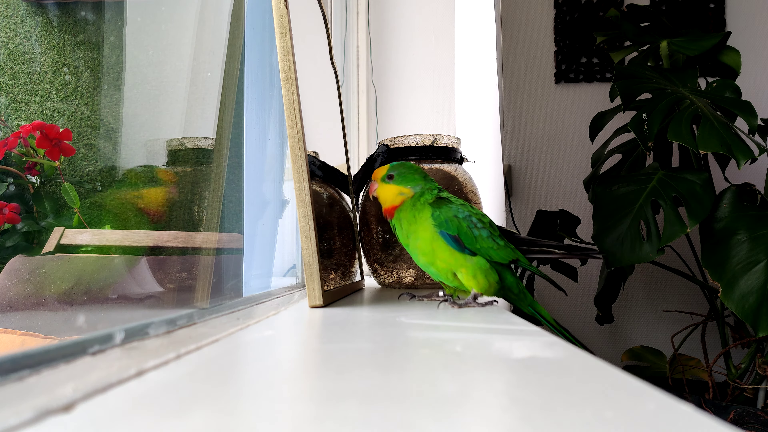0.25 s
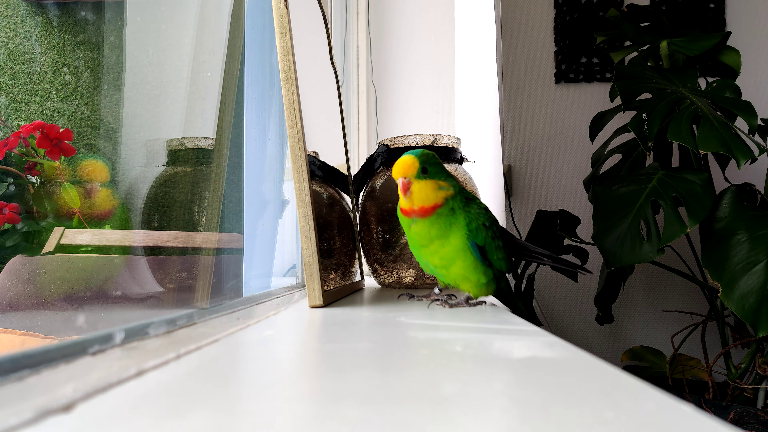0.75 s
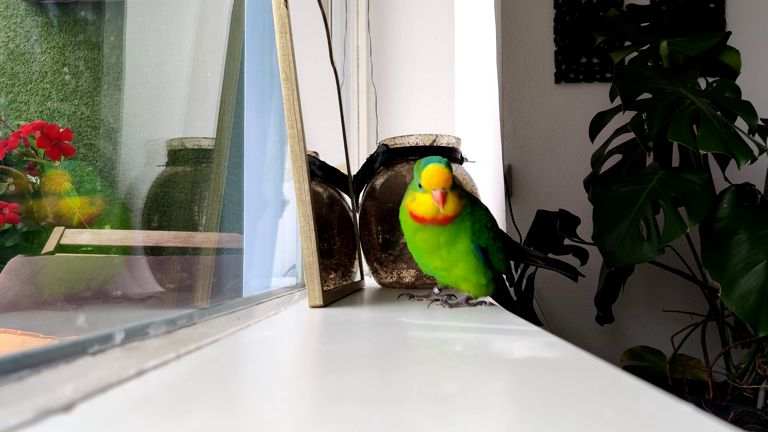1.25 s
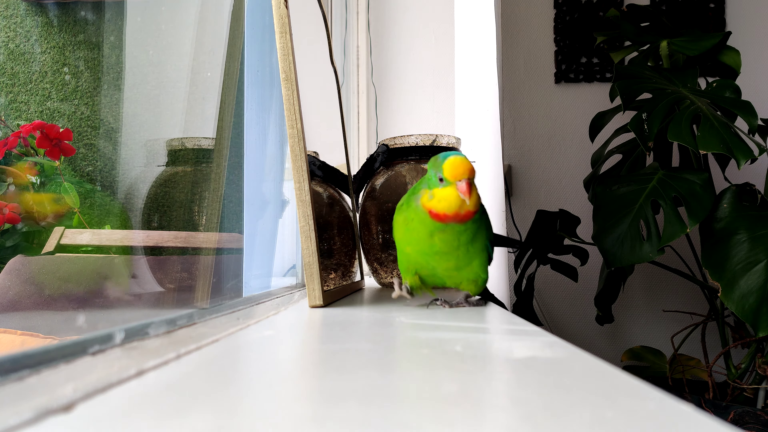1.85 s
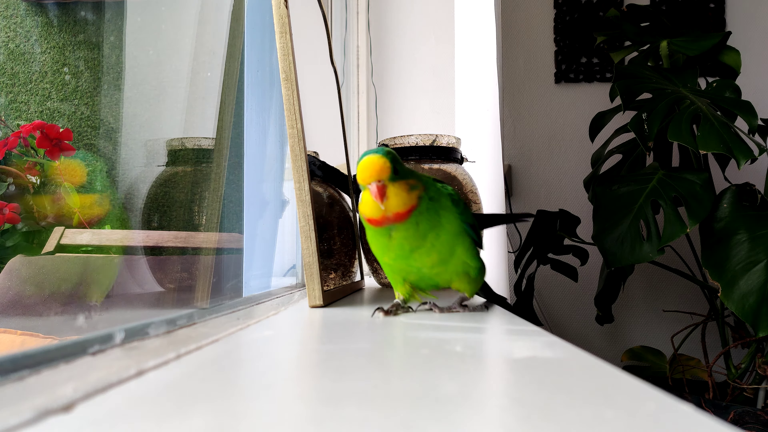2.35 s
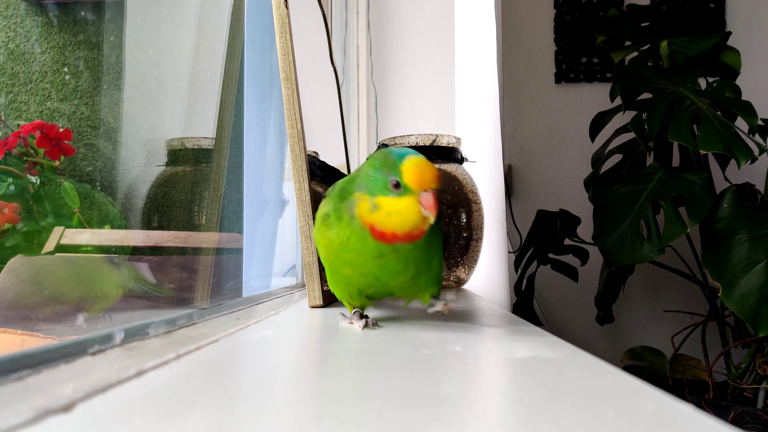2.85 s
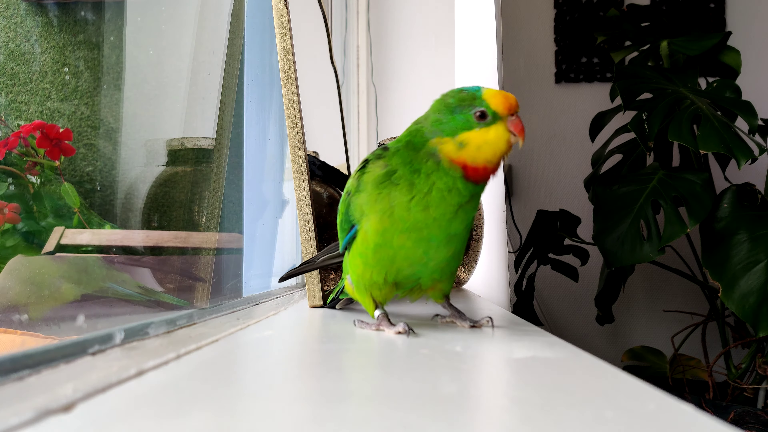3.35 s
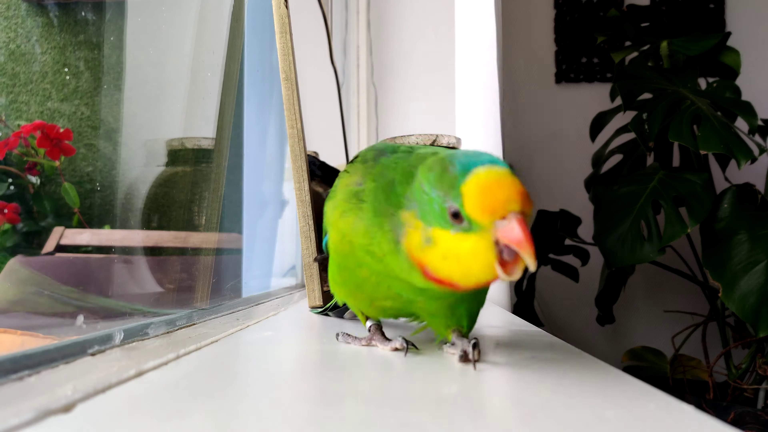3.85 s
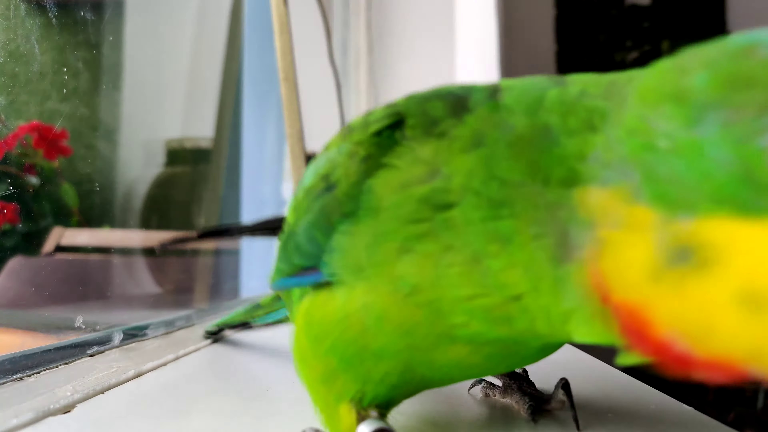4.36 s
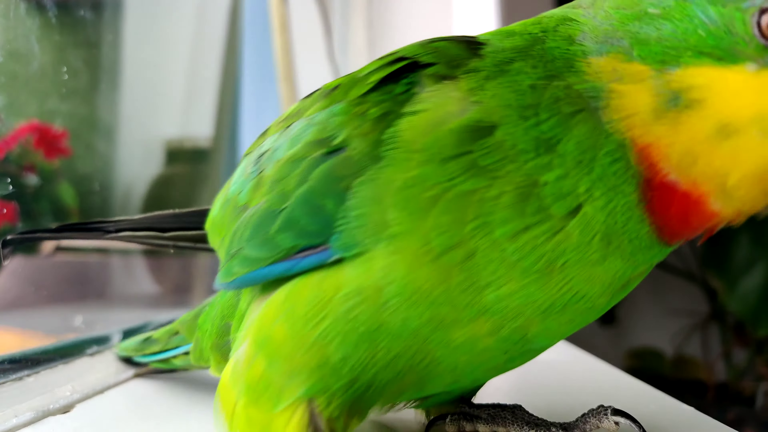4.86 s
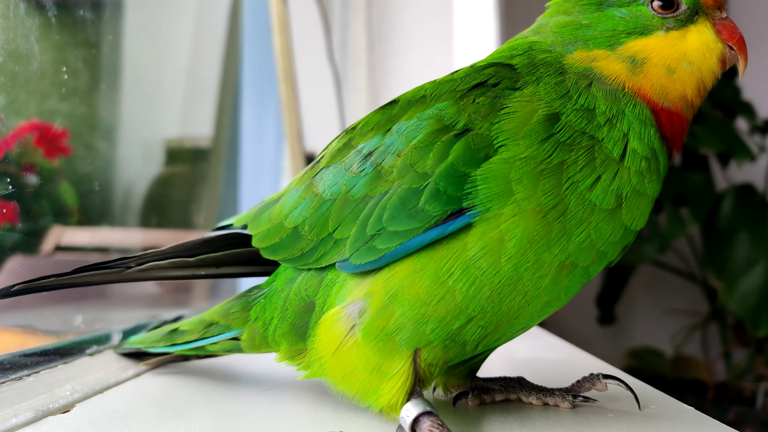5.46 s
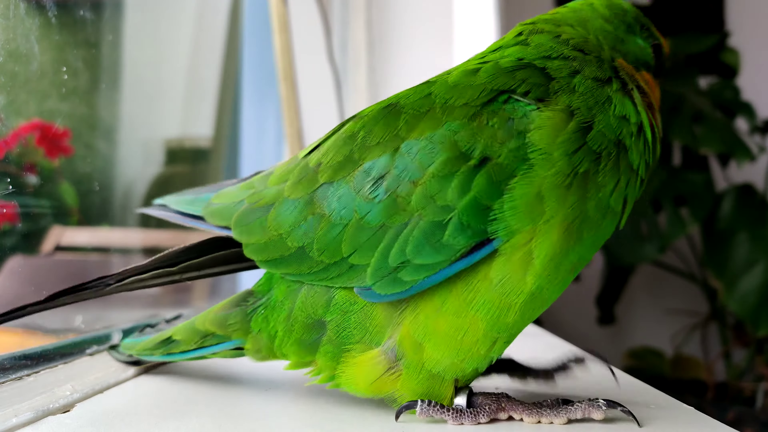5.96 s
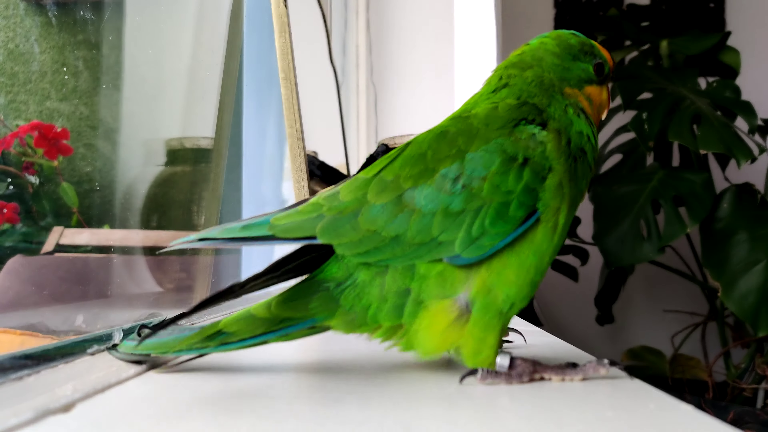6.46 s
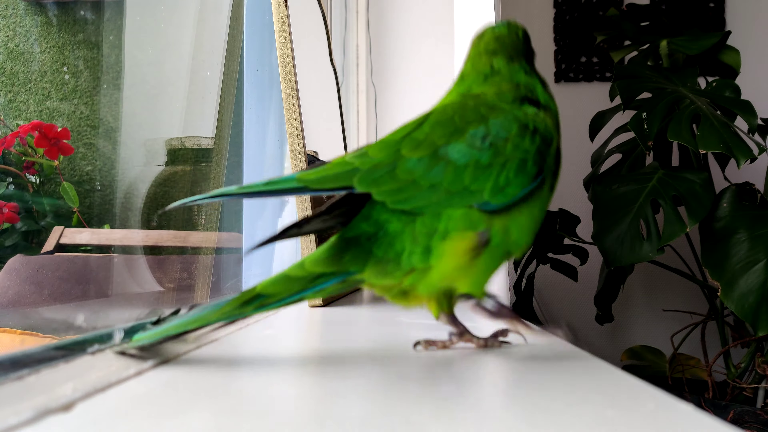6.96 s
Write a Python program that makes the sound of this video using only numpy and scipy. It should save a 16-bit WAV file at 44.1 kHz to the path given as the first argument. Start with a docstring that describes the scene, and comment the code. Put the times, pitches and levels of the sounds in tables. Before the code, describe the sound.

A harsh, pulsing parrot shriek rings through a hard-walled room, then low rumble and faint hiss remain. Small clawed feet start tapping on a hollow board, hurrying up to the stereo microphones with clicks, scratches and dull thumps. A close, bright, very quick chattering call drops in pitch, followed by a single clear yip. Near silence follows, then sparse steps and light rustling at the end.

```python
"""Parrot on a hollow sill

A parrot gives a harsh warbling squawk, patters up to the microphones, then chatters a falling call and a yip.
Calls are harmonic tones with roughness and breath noise, shaped by throat and beak resonances.
Steps are filtered noise bursts, ringing modes and claw scrapes; calls and steps excite a bare room.
Rumble, hiss, hum and a brief drone lie below; a limiter on each channel ducks under peaks and recovers."""
import sys
import numpy as np
from scipy import signal
from scipy.fft import rfft, irfft, next_fast_len
from scipy.io import wavfile
from scipy.ndimage import uniform_filter1d, minimum_filter1d, map_coordinates

SR = 44100
rng = np.random.default_rng(int(sys.argv[2]) if len(sys.argv) > 2 else 0)


def file_out(sig):
    """Save sig as 16-bit WAV at sys.argv[1]."""
    # one column per channel
    cols = np.atleast_2d(sig).T
    # limit, then scale
    lim = np.clip(cols, -1, 1)
    pcm = np.round(lim * 32767).astype(np.int16)
    wavfile.write(sys.argv[1], SR, pcm)


N = 317961
TOP_HZ = 16000  # band limit of the voices and of the output

# steps on the sill: t/s, strength/dB, claw raised and pad lowered by/dB, thud relative to strength/dB
FOOTFALLS = [(1.859, -58, 0.5, -5.5), (1.954, -53.5, -1, 5), (1.965, -55.5, 0.5, 1), (2.141, -60, -4, 5),
             (2.193, -48, -3.5, 3.5), (2.403, -47, -7.5, 1.5), (2.6, -48.5, -3, 4.5),
             (2.795, -47, -1.5, -1), (2.888, -60.5, 2.5, -3), (2.961, -46, 2, -5), (3.184, -48.5, -7, 6),
             (3.522, -49.5, 4.5, -4), (3.704, -45, -6.5, 7.5), (3.896, -49, 3.5, 9.5),
             (4.056, -53.5, 6, -7), (4.102, -45, -1.5, 6), (4.11, -39.5, -1, -6.5), (4.135, -39, -7.5, 0.5),
             (4.268, -46, 6, 3.5), (4.397, -47, 1.5, 6), (4.501, -49, 7.5, -1), (4.515, -43.5, 5, 10),
             (4.558, -39, -1.5, 8), (4.578, -48, -8.5, -1), (4.844, -43.5, 1, 9),
             (5.038, -47.5, -3.5, 15.5), (5.961, -53, 2, 7), (6.12, -46, 0.5, 1), (6.362, -47, -1.5, 5),
             (6.481, -50.5, 1, 7.5), (7.02, -57.5, 3, 5.5), (7.099, -46.5, 3.5, 0.5), (7.141, -45, 1.5, 4)]


def amp(db):
    """Decibels to gain."""
    return 10 ** (np.asarray(db) / 20)


def unit(x):
    """Scale to rms 1."""
    return x / np.sqrt(np.mean(x ** 2) + 1e-20)


def along(points, hz):
    """Read (f/Hz, value) points on a log-frequency axis."""
    f, v = np.transpose(points)
    return np.interp(np.log(hz + 1), np.log(f), v)


def wobble(rate_hz, size):
    """Smooth random curve with rate_hz knots a second."""
    knots = rng.standard_normal(int(size * rate_hz / SR) + 4)
    return map_coordinates(knots, [np.arange(size) * rate_hz / SR])


def filtered(x, response):
    """Multiply the spectrum of x by a function of f/Hz."""
    m = next_fast_len(x.shape[-1] + 8192)
    spectrum = rfft(x, m) * response(np.fft.rfftfreq(m, 1 / SR))
    return irfft(spectrum, m)[..., :x.shape[-1]]


def noise(spectrum, shape):
    """Coloured noise of rms 1."""
    return unit(filtered(rng.standard_normal(shape), lambda hz: amp(along(spectrum, hz))))


def causal(spectrum, size):
    """Minimum-phase impulse response of a given colour: sharp start, then decay."""
    log_gain = np.log(amp(along(spectrum, np.fft.rfftfreq(2 * size, 1 / SR))))
    cepstrum = irfft(log_gain)
    folded = np.r_[cepstrum[0], 2 * cepstrum[1:size]]
    return irfft(np.exp(rfft(folded, 2 * size)))[:size]


def ports(side_db):
    """Left and right gains of mean 1 for a left-minus-right level difference."""
    gains = amp(np.array([[.5], [-.5]]) * side_db)
    return gains / gains.mean(0)


def add(track, s, sound):
    """Mix a sound into a track at time s."""
    part = track[..., max(round(s * SR), 0):][..., :sound.shape[-1]]
    part += sound[..., :part.shape[-1]]


def fades(t, attack_s, release_s):
    """Gain of a note that rises, holds and falls linearly."""
    return np.clip(t / attack_s, 0, 1) * np.clip((t[-1] - t) / release_s, 0, 1)


def background():
    """Soft rumble and hiss as stereo noise, a wavering low hum and one brief deeper drone."""
    # quiet room: f/Hz, relative density/dB per Hz
    air_spectrum = [(20, -1), (45, -1), (70, -10), (105, -8), (150, -14.5), (222, -14.5), (370, -18.5),
                    (740, -20.5), (1400, -29), (2500, -30.5), (5200, -40.5), (8000, -46), (13000, -42),
                    (16000, -45)]
    t = np.arange(N) / SR
    mid, side = noise(air_spectrum, (2, N))
    side_spectrum = [(100, -13.0), (1000, -1.5), (4000, 0.5), (9000, 0.5)]
    side = filtered(side, lambda hz: amp(along(side_spectrum, hz)))
    balance = [(40, 1.5), (200, 3.5), (1000, 3.3), (6000, 0.5)]  # f/Hz, left minus right/dB
    air = filtered(np.array([mid + side, mid - side]), lambda hz: ports(along(balance, hz)))
    hum_hz = 228 + 4 * wobble(25, N)
    hum = np.sin(2 * np.pi * np.cumsum(hum_hz) / SR) * amp(3 * wobble(4.7, N))
    hum_db = np.interp(t, [0, 1.3, 2.7, 4.5, 7.2], [-69.0, -61.5, -58.0, -65.5, -65.5])
    drone = amp(-53.0) * np.sin(2 * np.pi * 101 * t) * np.exp(-((t - 6.7) / 0.17) ** 2)
    sway_db = .8 * wobble(4, N)
    return amp(-53.5 + sway_db) * air + (amp(hum_db) * hum + drone) * ports(4.7)


def room(x, build_s):
    """Room reverberation: noise builds up, then each frequency decays at its own speed."""
    # decay: f/Hz, t60/s
    room_t60 = [(150, 1), (1000, 0.62), (3000, 0.54), (5500, 0.46), (9000, 0.45), (15000, 0.4)]
    # tail colour: f/Hz, level/dB
    room_colour = [(150, -3), (1100, -6.5), (1800, -3.5), (2600, 0.5), (3200, -3), (3800, 0.5),
                   (4500, -3.5), (5400, 1), (6500, 1), (9000, -3), (15000, 0)]
    # tail balance: f/Hz, left minus right/dB
    room_side = [(200, -0.5), (700, 7), (1300, -0.5), (4400, 0.5), (8000, -3), (15000, -3)]
    hz, t, z = signal.stft(rng.standard_normal((2, SR)), SR, nperseg=256)
    envelope = amp(-60 * t / along(room_t60, hz)[:, None]) * (1 - np.exp(-t / build_s))
    tail = signal.istft(z * envelope, SR, nperseg=256)[1]
    tail = unit(tail) / np.sqrt(SR)
    tail = filtered(tail, lambda f: amp(along(room_colour, f)) * ports(along(room_side, f)))
    return signal.fftconvolve(np.atleast_2d(x), tail, axes=1)[:, :N]


def ringing(modes, attack_s):
    """Damped modes, at new strengths for each blow."""
    t = np.arange(SR // 2) / SR
    total = sum(amp(db + rng.normal(0, 2.7) - 60 * t / t60) * np.sin(2 * np.pi * hz * t)
                for hz, db, t60 in modes)
    return total * (1 - np.exp(-t / attack_s))


def recoloured(spectrum):
    """Each step lands on another spot: bands are raised and lowered by chance."""
    spot_colour_db = 1.3
    return [(hz, db + rng.normal(0, spot_colour_db)) for hz, db in spectrum]


def contact(spectrum, t60, spike_db, linger_db, linger_t60, apart, grain_db):
    """One sharp push, a grainy scatter of toes and a weaker rattle; the scatter differs at the two ports."""
    t = np.arange(SR // 5) / SR
    grain = amp(grain_db * wobble(600, len(t)))
    decay = amp(-60 * t / t60) + amp(linger_db - 60 * t / linger_t60)
    scatter = rng.standard_normal((2, len(t))) * grain * decay
    mid, side = scatter / np.linalg.norm(scatter[0])
    mid = mid + amp(spike_db) * (t == 0)
    pair = [mid + apart * side, mid - apart * side]
    pair = signal.fftconvolve(pair, causal(spectrum, size=2048)[None], axes=1)
    # energy of the channel mean = rms 1 over 10 ms
    return pair / np.sqrt(np.sum(pair.mean(0) ** 2) / (SR / 100))


def footfall(db, claw_db, weight_db):
    """Board and claw sounds of one step: thud and knock of the pad, click and scratch of the claw."""
    # four parts of a step: f/Hz, relative density/dB per Hz
    thud_spectrum = [(35, -9), (130, -4.5), (300, -8.5), (550, -14.5), (2000, -64)]
    knock_spectrum = [(150, -20), (420, 2), (850, 5), (1500, 0), (2800, -8.5), (8000, -47.5)]
    click_spectrum = [(900, -33.5), (2500, -4), (3800, -2), (5000, 0.5), (7000, -9), (11000, -16.5)]
    scratch_spectrum = [(4000, -27.5), (9000, -1.5), (13500, -5.5), (16000, 0)]
    thud = contact(thud_spectrum, t60=0.052, spike_db=-5, linger_db=-12.5,
                   linger_t60=0.22, apart=0.64, grain_db=2.0)
    knock = contact(recoloured(knock_spectrum), t60=0.027, spike_db=0.0, linger_db=-6.0,
                    linger_t60=0.075, apart=0.94, grain_db=5.0)
    click = contact(recoloured(click_spectrum), t60=0.028, spike_db=-3.5, linger_db=-18.5,
                    linger_t60=.09, apart=0.92, grain_db=7)
    scratch = contact(scratch_spectrum, t60=.018, spike_db=-3.5, linger_db=-19.5,
                      linger_t60=.09, apart=1.0, grain_db=7.5)
    board = amp(db + weight_db - 1.5) * thud + amp(db - claw_db - 2.5) * knock
    claw = amp(db - 3.0) * click + amp(db + claw_db - 1.0) * scratch
    return board, claw * ports(side_db=3.0)


def toe_taps():
    """Light steps at random moments while the bird walks."""
    # spells of walking: from/s, to/s
    walks = [(1.85, 4.6), (5.85, 7.2)]
    taps_per_s, tap_db, spread_db = 2.5, -63.5, 3.5
    taps = []
    for start, end in walks:
        for _ in range(round(taps_per_s * (end - start))):
            taps.append((rng.uniform(start, end), rng.normal(tap_db, spread_db), 0, 0))
    return taps


def scrapes():
    """Claw scrapes, feather brushes and a drag after each listed step: grainy noise swells."""
    # scraping and brushing: centre t/s, half-length/s, level/dB
    rustles = [(2.251, .17, -64), (3.0, .06, -65.5), (3.78, .017, -46.5), (4.08, .028, -56),
               (4.477, .03, -47.5), (4.525, .045, -44.5), (4.835, .05, -52.5), (5.072, .08, -54),
               (6.201, 0.28, -66.5), (7.05, .1, -61.5), (7.171, .07, -59.5)]
    drag_delay_s, drag_half_length_s, drag_db = .02, 0.034, -20
    drags = [(s + drag_delay_s, drag_half_length_s, db + claw_db + drag_db)
             for s, db, claw_db, _ in FOOTFALLS]
    spectrum = [(1500, -12), (5000, -0.5), (9000, -3), (15000, -9.0)]
    track = np.zeros((2, N))
    for s, half_length_s, db in rustles + drags:
        size = int(2 * half_length_s * SR)
        grains = unit(noise(spectrum, (2, size)) * amp(4.5 * wobble(500, size)))
        add(track, s - half_length_s, amp(db) * grains * np.hanning(size) ** 2)
    return track


def feet():
    """Steps knock and tick; weight shifts boom in the sill's modes, and a few steps set metal ringing."""
    # heavy shifts of weight: t/s, level/dB
    thumps = [(.383, -40), (1.952, -55), (2.186, -52), (2.601, -49), (2.961, -46), (4.395, -46),
              (4.515, -43), (4.562, -45.5), (5.038, -36)]
    # sill modes: f/Hz, level/dB, t60/s
    sill_modes = [(139.3, 1, 0.3), (102.3, -6, 0.25), (226.2, -4, 0.13), (310.3, -5.5, 0.14),
                  (430, -7.5, .06), (1080, -5, 0.053)]
    # steps that set metal ringing: t/s, level/dB
    clinks = [(1.857, -70), (2.595, -57.5)]
    # faint metal ring: f/Hz, level/dB, t60/s
    metal_modes = [(1870, 2, 0.27), (3020, -2, 0.24), (3650, -7, 0.22), (4800, -2.5, 0.12),
                   (4600, -3.5, .32), (4885, -1, 0.28), (6240, -8, 0.2), (6230, -8.5, 0.21),
                   (7640, -10, 0.195), (7660, -1.5, 0.24), (9400, -2, 0.26)]
    sill, claws = np.zeros((2, N)), scrapes()
    for s, db, claw_db, weight_db in FOOTFALLS + toe_taps():
        board, claw = footfall(db, claw_db, weight_db)
        add(sill, s, board)
        add(claws, s, claw)
    for s, db in thumps:
        add(sill, s, amp(db) * ringing(sill_modes, attack_s=0.0013))
    for s, db in clinks:
        add(claws, s, amp(db) * ringing(metal_modes, attack_s=0.0042) * ports(1.3))
    # the board reaches the left port 8 samples earlier and louder
    sill = np.array([sill[0], np.roll(sill[1], 8)]) * ports(7.5)
    return sill + claws + amp(-10.5) * room(sill + claws, build_s=.008)


def syrinx(start, pitch, gain, rough, tilt_db, beak, jitter, flutter_db, rasp_db, half_db,
           throat_db=0, throat_width_hz=400):
    """A harmonic tone sweeps through throat and beak resonances; roughness shakes it and doubles its period."""
    # sharpest throat resonance; it sinks overall as the throat lengthens: t/s, f/Hz
    throat = [(.05, 4282), (.075, 5620), (.088, 5640), (.104, 4550), (.117, 4419), (.145, 3588),
              (.16, 3650), (.2, 3700), (.212, 3245), (.25, 3190)]
    flicker_db = 3  # independent flicker of each partial at full roughness
    t = start + np.arange(len(pitch)) / SR
    shaken_hz = pitch * (1 + jitter * rough * wobble(900, len(t)))
    phase = 2 * np.pi * np.cumsum(shaken_hz) / SR
    throat_hz = np.interp(t, *np.transpose(throat))

    def partials(k):
        """Multiples k of the pitch, lifted by throat_db as they cross the throat resonance."""
        hz = k * pitch
        gain_db = tilt_db * np.log2(np.maximum(k, 1))
        gain_db = gain_db + throat_db / (1 + ((hz - throat_hz) / throat_width_hz) ** 2)
        gain_db = gain_db + flicker_db * rough * np.array([wobble(400, len(t)) for _ in k])
        waves = np.sin(k * phase + rng.uniform(0, 2 * np.pi, k.shape))
        return np.sqrt(2) * np.sum(amp(gain_db) * (hz < TOP_HZ) * waves, axis=0)

    harmonics = np.arange(1, 15)[:, None]
    tone = partials(harmonics) + amp(half_db) * rough * partials(harmonics - .5)
    # turbulent air escapes once a cycle
    rasp = amp(rasp_db) * rough * rng.standard_normal(len(t)) * (1 + np.cos(phase))
    source = gain * amp(flutter_db * rough * wobble(700, len(t))) * (tone + rasp)
    voice = np.zeros(N)
    add(voice, start, signal.fftconvolve(source, causal(beak, size=1024)))
    return voice


def placed(voice, side, wet_db, build_s):
    """A call reaches each port with its own level and phase, then again by way of the room."""
    side = np.array(side)

    def paths(hz):
        lead_rad = along(side[:, ::2], hz)
        return ports(along(side[:, :2], hz)) * np.exp(np.array([[.5j], [-.5j]]) * lead_rad)

    return filtered(voice, paths) + amp(wet_db) * room(voice, build_s)


def chirp(beak, s, length_s, first_hz, held_hz, last_hz, db, rough, tilt_db):
    """A short note drops onto its pitch, holds and curls away, weakening as the pitch lifts."""
    drop_s, curl_power = .0019, 3.0
    attack_s, release_s, curl_db_per_octave = 0.0014, .0016, -15
    t = np.arange(0, length_s, 1 / SR)
    drop_hz = (first_hz - held_hz) * np.exp(-t / drop_s)
    curl_hz = (last_hz - held_hz) * (t / length_s) ** curl_power
    pitch = held_hz + drop_hz + curl_hz
    gain = amp(db + curl_db_per_octave * np.log2(pitch / held_hz)) * fades(t, attack_s, release_s)
    return syrinx(s, pitch, gain, rough, tilt_db, beak,
                  jitter=.06, flutter_db=5.5, rasp_db=-10.5, half_db=-21)


def squawk():
    """A high rough shriek; swoops pull its pitch, level, roughness and tilt towards a clearer tone."""
    # open throat and beak: f/Hz, level/dB
    open_beak = [(400, -27), (570, -9), (740, -28.5), (900, -18), (1080, -6), (1600, -12), (1870, -18),
                 (2200, -6), (2700, -7.5), (3400, -5), (4000, -3), (4450, -4.5), (4950, -13.5),
                 (5550, -7.5), (7400, -23.5), (8800, -12.5), (10800, -23), (13000, -39.5), (15500, -31)]
    # swoops: bottom t/s, fall/s, rise/s, lowest f/Hz, level/dB, tilt/dB per octave, shriek after it/dB
    swoops = [(.06, .02, .02, 1206, -12.5, 2, -10.5), (.112, .0185, .0095, 1095, -7.5, -2, -12),
              (.152, .0115, 0.013, 1114, -6, -1, -25.5), (.196, .0098, .0105, 1230, -5, -2.5, -8.5),
              (.244, .0135, 0.015, 1021, -4.5, -4, -10)]
    start_s, end_s, attack_s, release_s = .052, .256, .005, .008
    shriek_hz, shriek_rough, shriek_tilt_db = 1614, 0.65, -0.64  # tilts in dB per octave
    swoop_rough, swoop_squareness = .24, 3.2
    settle_in_s, mellow_tilt_db = .021, -10  # smooth, mellow onset turns harsh
    t = np.arange(start_s, end_s, 1 / SR)
    age = t - t[0]
    s, fall, rise, low_hz, swoop_db, swoop_tilt_db, shriek_db = np.transpose(swoops)[..., None]
    distance = np.abs((t - s) / np.where(t < s, fall, rise))
    depth = .5 ** (distance ** swoop_squareness)

    def pulled(shriek, swoop):
        return shriek + np.sum(depth * (swoop - shriek), axis=0)

    latest = np.maximum(np.sum(t > s, axis=0) - 1, 0)
    gain = amp(pulled(shriek_db[latest, 0], swoop_db)) * fades(age, attack_s, release_s)
    mellow = np.exp(-(age / settle_in_s) ** 2)
    rough = pulled(shriek_rough, swoop_rough) * (1 - mellow)
    tilt_db = pulled(shriek_tilt_db, swoop_tilt_db) + mellow_tilt_db * mellow
    return syrinx(t[0], pulled(shriek_hz, low_hz), gain, rough, tilt_db, open_beak, jitter=0.047,
                  flutter_db=6, rasp_db=1, half_db=-12, throat_db=9.5, throat_width_hz=500)


def calls():
    """Squawk from the far end of the sill, then nearby murmurs, chatter and, with the head turned, the yip."""
    # beak half closed, then turned to the microphones with more treble: f/Hz, level/dB
    half_beak = [(700, -18), (1400, -4.5), (1800, 0.5), (2300, -2.5), (3600, 6), (4500, 3), (5400, -2),
                 (7100, -11.5), (9000, -16.5), (10800, -24.5), (14500, -28.5)]
    turned_beak = [(700, -20), (1400, -2.5), (1800, 0), (3600, 5), (5400, -6), (7100, -10.5), (9000, -9.5),
                   (10800, -11), (12500, -15), (14500, -18)]
    # direct sound of squawk, chatter, yip: f/Hz, left minus right/dB, left phase lead/rad
    far_side = [(1200, 4.5, .5), (2400, 9.5, 0.7), (3377, 5.5, 1.8), (4500, 4, 1.5), (6000, 2, 2),
                (8550, -10, 1.5), (10920, -5.5, 2.7), (15060, -1.5, 2)]
    near_side = [(1450, -1.5, -0.83), (2350, 5.5, -2), (4300, -7, -3), (8000, -8, -5.5), (14740, 0, -8.5)]
    yip_side = [(1800, 6, -0.5), (3610, -3, 0.24), (4970, 1.5, 0.5), (7200, -10.5, 1.6), (9090, -5.5, -6.5),
                (15000, -1, -2.5)]
    # two murmurs, chatter, yip: t/s, length/s, first f/Hz, held f/Hz, last f/Hz, level/dB,
    # roughness (0-1), tilt/dB per octave
    chirps = [(1.137, 0.01, 1800, 1780, 1770, -60, 0.17, -25),
              (1.148, 0.0178, 1270, 1100, 1080, -47.5, 0, -26),
              (4.935, .0205, 2916, 2381, 3239, -19, 0.2, -16),
              (4.9573, .026, 2887, 2240, 3250, -16.5, .12, -14),
              (4.983, .024, 2938, 2151, 3287, -12.5, 0.2, -15),
              (5.005, .013, 2109, 1490, 1362, -17, .6, -6.5), (5.025, .005, 1396, 1300, 1257, -34, .9, 0.5),
              (5.041, .009, 1200, 1120, 1036, -28, .3, -20.5),
              (5.125, .0265, 2024, 1791, 1733, -16, .14, -3.5)]
    head_turn_s = 5.1
    chatter = sum(chirp(half_beak, *row) for row in chirps if row[0] < head_turn_s)
    yip = sum(chirp(turned_beak, *row) for row in chirps if row[0] >= head_turn_s)
    return (placed(amp(-2.44) * squawk(), far_side, wet_db=-6.5, build_s=.012)
            + placed(chatter, near_side, wet_db=-16, build_s=.006)
            + placed(yip, yip_side, wet_db=-10.5, build_s=0.0045))


def scene():
    """Quiet room, footsteps and calls."""
    return background() + feet() + calls()


def limiter(x, ceiling, hold_s, release_s):
    """Each channel's gain drops within 2 ms around a peak, holds, then glides back."""
    ahead, held = SR // 500, int(hold_s * SR) | 1
    needed = np.minimum(1, ceiling / (np.abs(x) + 1e-9))
    gain = minimum_filter1d(needed, ahead)
    gain = minimum_filter1d(gain, held, origin=held // 2, mode="nearest")
    pole = np.exp(-1 / (release_s * SR))
    gliding = 1 - signal.lfilter([1 - pole], [1, -pole], 1 - gain)
    return x * uniform_filter1d(np.minimum(gain, gliding), ahead)


def record(dry):
    """Limit the peaks, then remove everything above the band limit."""
    limited = limiter(dry, ceiling=0.98, hold_s=0.079, release_s=0.036)
    return filtered(limited, lambda hz: hz < TOP_HZ)


dry = scene()
out = record(dry)
file_out(out)
```